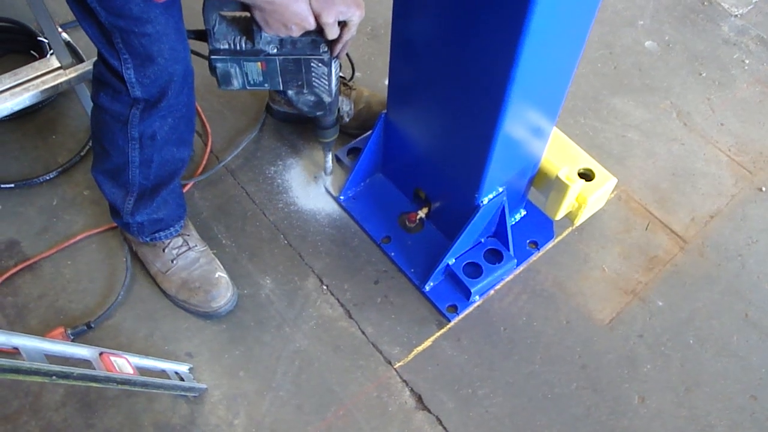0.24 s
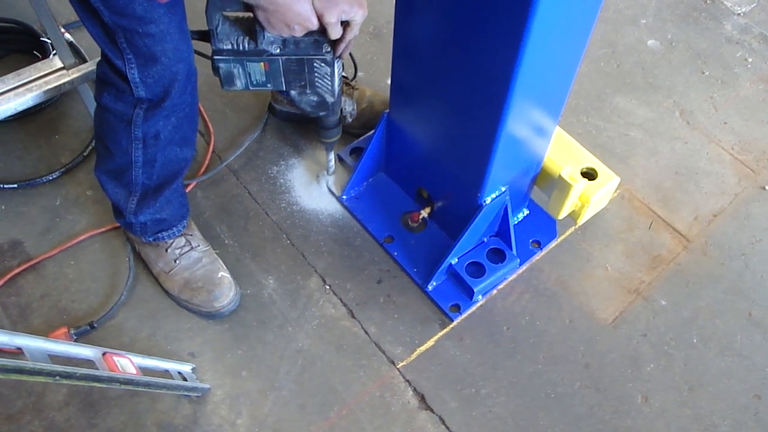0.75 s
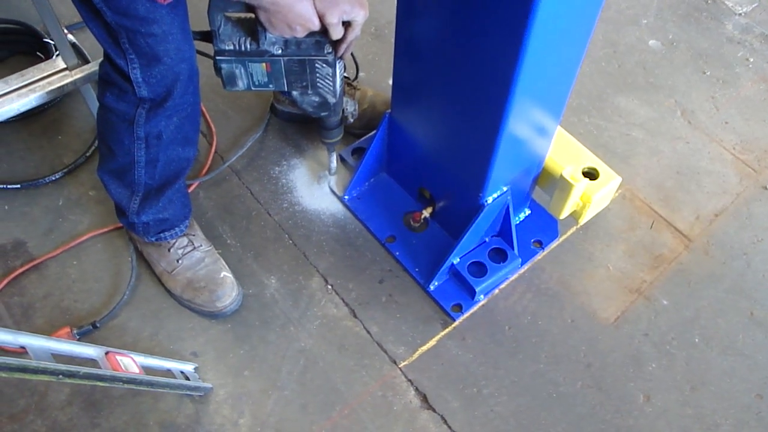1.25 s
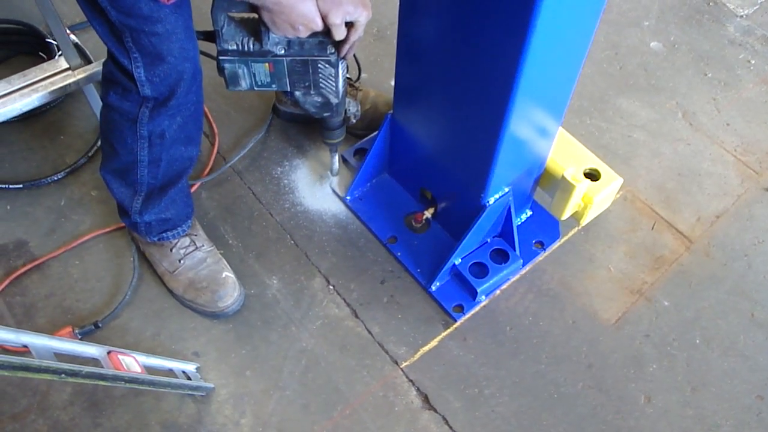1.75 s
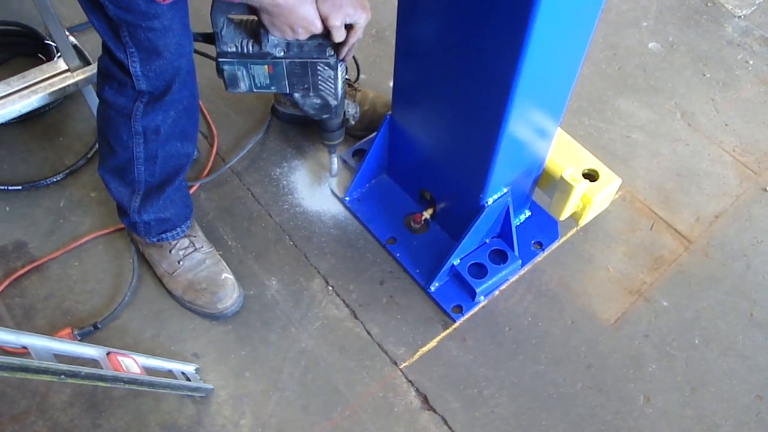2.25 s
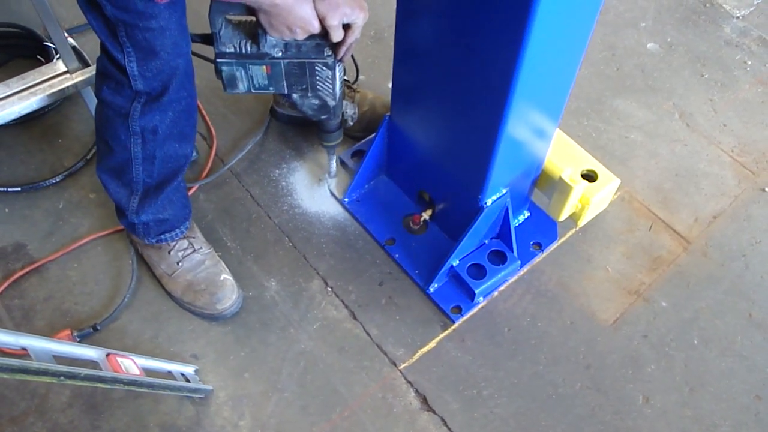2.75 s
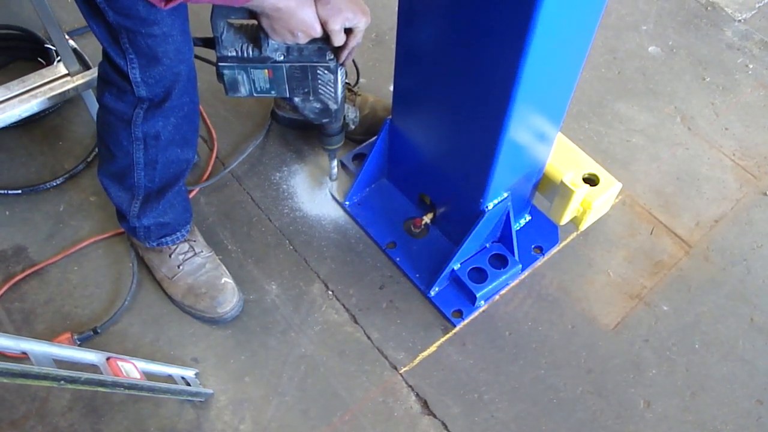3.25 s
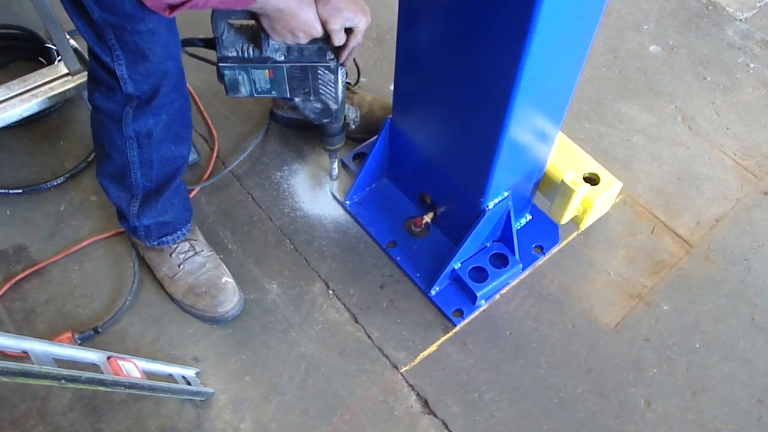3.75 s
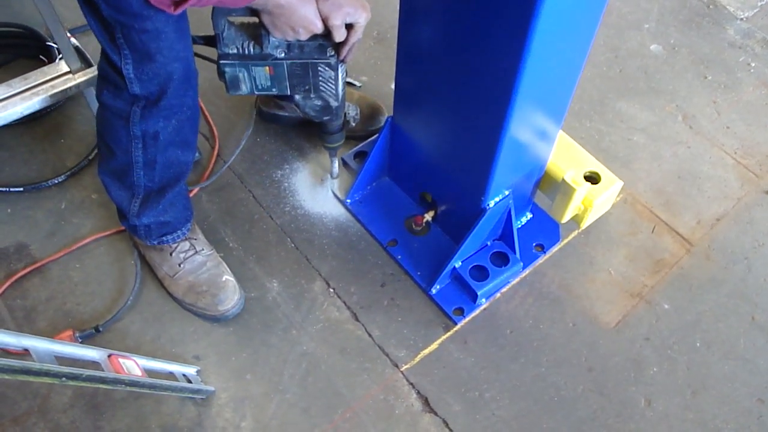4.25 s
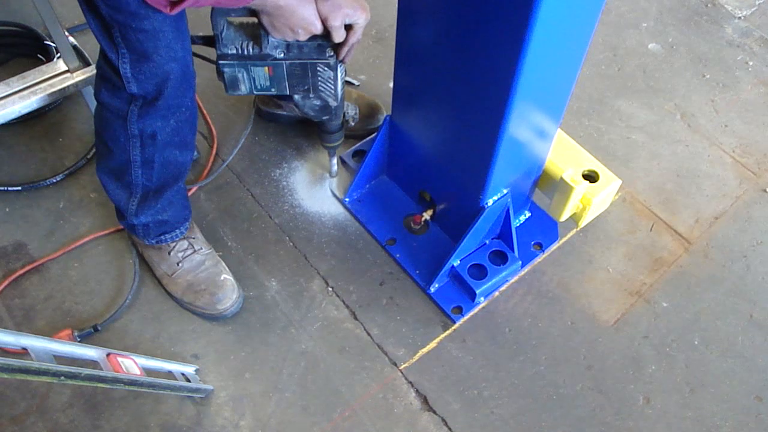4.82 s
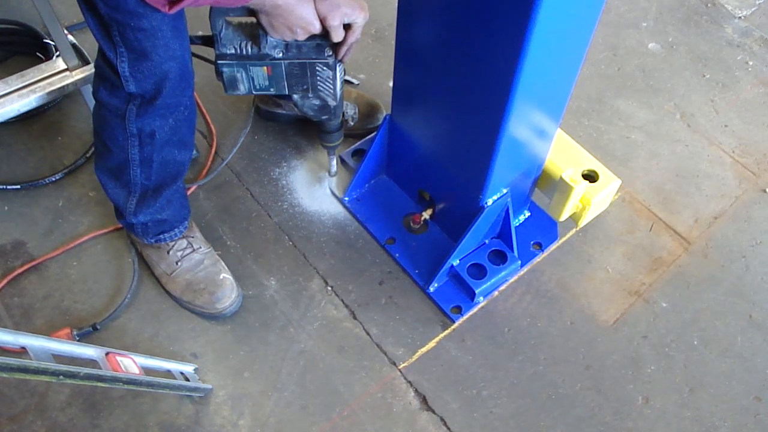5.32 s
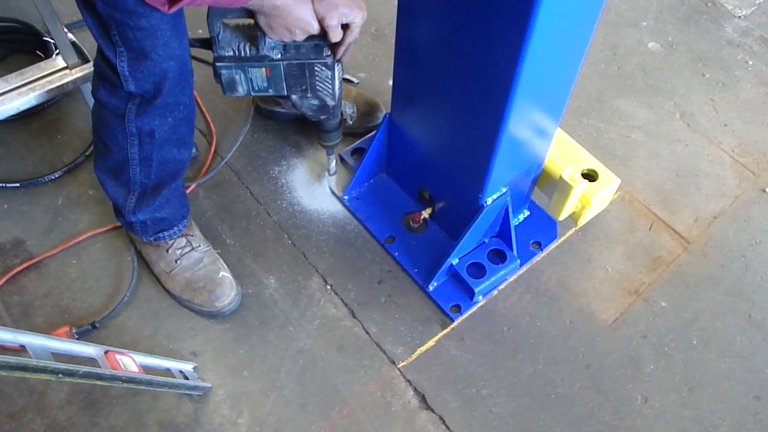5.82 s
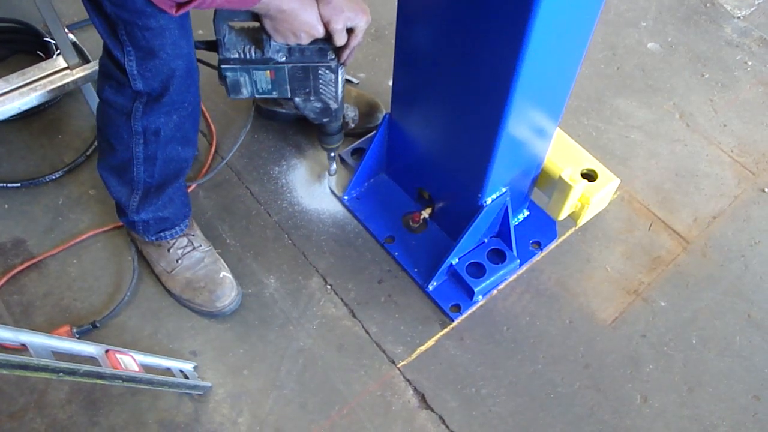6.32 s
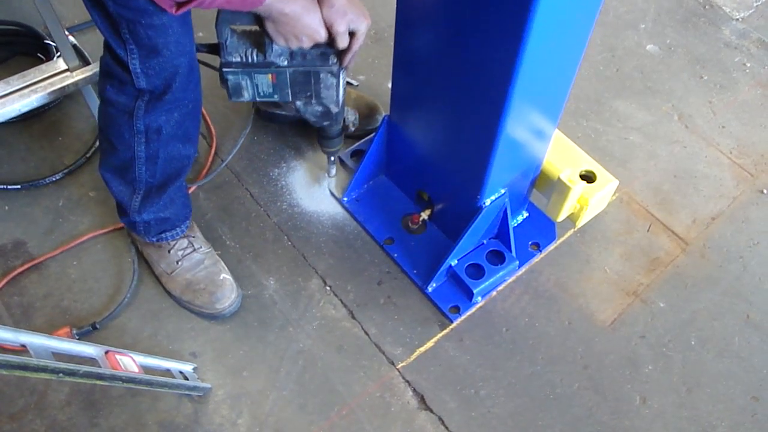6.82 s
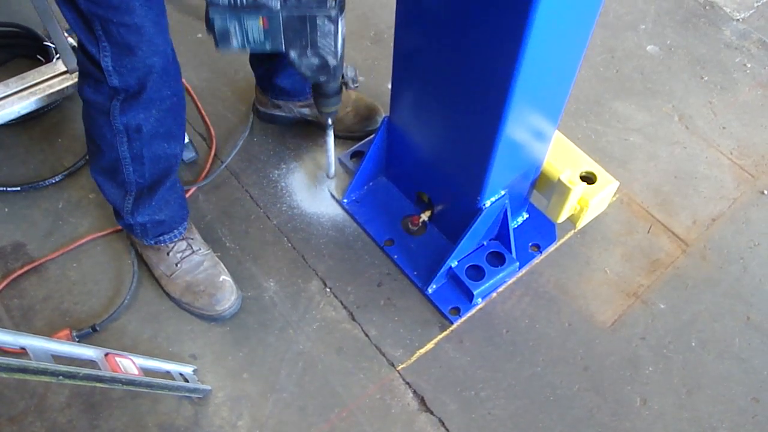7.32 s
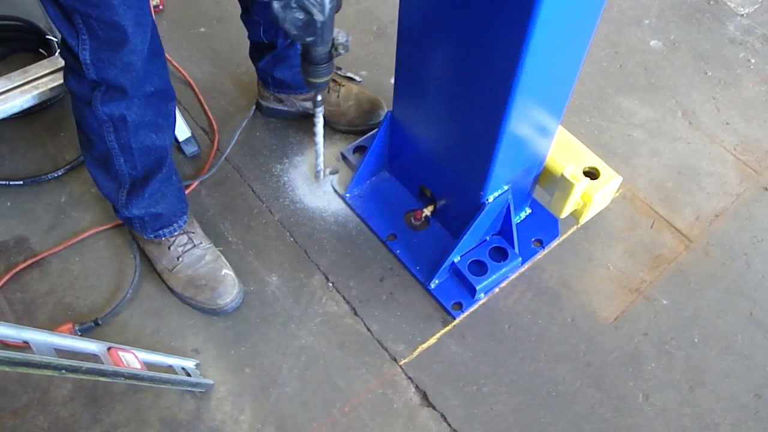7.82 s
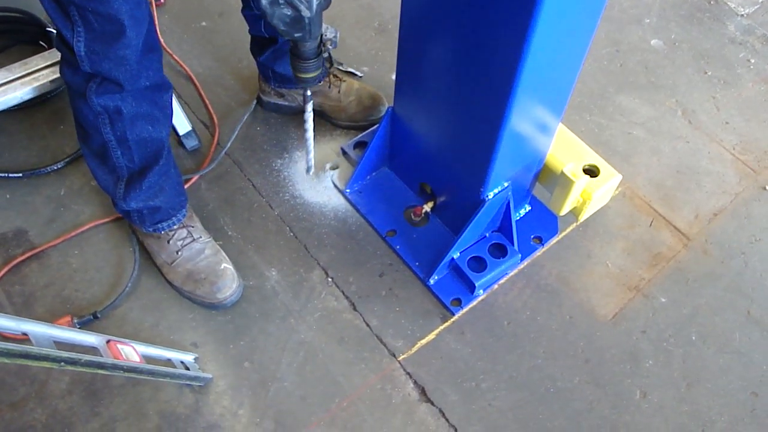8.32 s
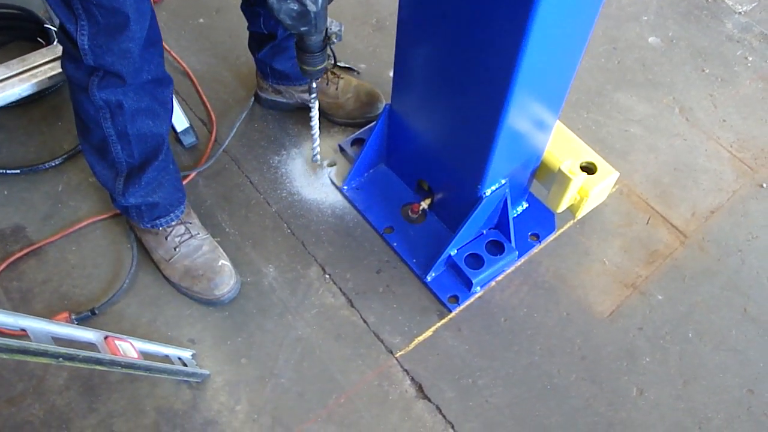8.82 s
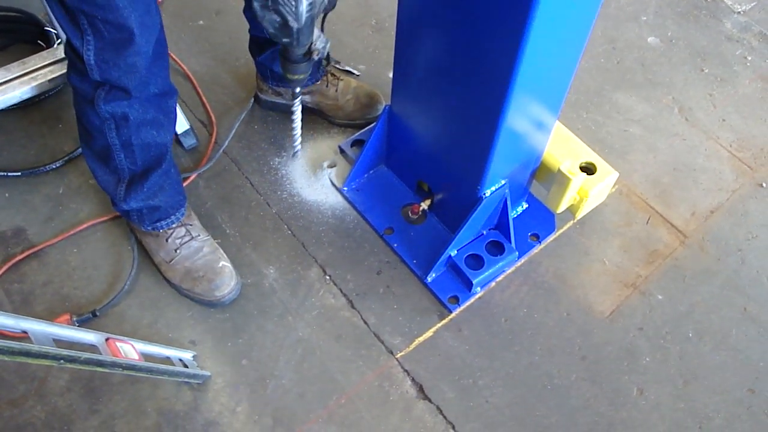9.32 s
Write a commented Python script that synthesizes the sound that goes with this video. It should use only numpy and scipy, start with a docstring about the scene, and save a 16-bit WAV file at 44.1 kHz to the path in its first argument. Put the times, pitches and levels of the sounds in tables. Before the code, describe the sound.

A rotary hammer drills into a concrete floor with a fast, buzzing steel clatter that grows steadily louder over a low hum. As the pressure eases, the bit rings and squeals. The motor switches off and coasts down with a falling gear whine while the loose bit scrapes and clinks, ending in a few knocks. The tool sounds close, in a slightly echoing workshop whose low roar swells at the end.

```python
"""Rotary hammer boring into concrete

About 71 blows a second, growing louder, force a workshop floor to hum and excite the modes of the steel.
As the pressure comes off, the bit rings and friction makes it squeal; drawn out, it clinks in the chuck.
The motor coasts down with a gear whine to a few last knocks, while the low roar of the hall swells."""
import sys
import numpy as np
from scipy import signal
from scipy.fft import rfft, irfft
from scipy.io import wavfile
from scipy.ndimage import uniform_filter1d

SR = 44100
rng = np.random.default_rng(int(sys.argv[2]) if len(sys.argv) > 2 else 0)


def output_pcm(signal):
    """Save a mono or channel-first signal as 16-bit PCM at the path in sys.argv[1].

    Samples are clipped to [-1, 1] before scaling.
    """
    pcm = np.clip(np.atleast_2d(signal).T, -1, 1) * 32767
    wavfile.write(sys.argv[1], SR, np.round(pcm).astype(np.int16))


N = 421590
T = np.arange(N) / SR
OFF_S = 7.508  # the motor is switched off
STEEL_FADE_DB, HOUSING_FADE_DB = 12.5, 4.5  # level lost per tenfold drop in crank speed

# crank speed under power, sagging as the bit rubs, rising once unloaded (t/s, f/Hz)
POWERED_SPEED = [(0, 69.99), (1.5, 70.58), (2, 71.08), (3, 70.77), (3.5, 70.7), (3.75, 71.15), (3.91, 70.1),
                 (4.1, 71.35), (4.34, 69.95), (4.5, 71.1), (4.75, 70.55), (5.07, 71.15), (5.3, 70.55),
                 (5.5, 70.85), (5.75, 70.75), (6, 66.02), (6.15, 70.9), (6.3, 67.67), (6.55, 67.12),
                 (6.75, 75.71), (7.2, 73), (7.508, 75.86)]
# steel clatter at full speed (t/s, level/dB)
CLATTER_LEVEL = [(0, -52), (1.8, -50), (2.12, -50), (2.9, -44.3), (3.8, -42), (5.4, -38), (6.65, -35.5),
                 (7.4, -29)]
# share of hammering clatter against free rattle; some lasts through the coast-down (t/s, share 0-1)
HAMMERING_SHARE = [(0, 0.96), (5.75, 0.87), (5.9, 0.7), (6.55, 0.76), (6.8, 0.37), (7.2, 0.41)]
# spells of eased pressure (start t/s, end t/s, final ring level/dB re clatter)
EASED_SPELLS = [(1.873, 2.115, -2.5), (5.813, 6.577, 1.5)]
# spectral envelope of the undamped bit outside the hole (f/Hz, level/dB)
FREE_BIT_SPECTRUM = [(40, -36), (100, -33), (300, -12), (600, -10.5), (1200, -11.5), (2400, -6.5),
                     (3400, -4), (4700, 1), (5300, -3.5), (6000, -2.5), (7800, -0.5), (8400, -10),
                     (9200, -4), (10700, -38), (14000, -33)]
# its resonances (f/Hz, width/Hz, lift/dB)
FREE_BIT_MODES = [(692, 114, 8.5), (1010, 140, 7.2), (1324, 100, 11), (1506, 115, 9.7), (1767, 190, 14),
                  (2010, 230, 9.3), (2610, 72, 6.1), (2947, 97, 11.6), (3140, 99, 5.3), (3920, 220, 6.2),
                  (4530, 180, 4.7), (5640, 110, 4.6), (6070, 110, 7.9), (6430, 100, 14.5), (7380, 260, 4.5),
                  (8060, 260, 5.9)]


def undb(db):
    """Amplitude ratio of a level in decibels."""
    return 10 ** (np.asarray(db) / 20)


def curve(rows, column=1):
    """Linear interpolation of a table column in time."""
    rows = np.array(rows, float)
    return np.interp(T, rows[:, 0], rows[:, column])


def swell(start, end):
    """Semi-elliptical envelope between two times."""
    age = np.clip((T - start) / (end - start), 0, 1)
    return np.sqrt(4 * age * (1 - age))


def after(time, ramp_s=.035):
    """Linear ramp from 0 to 1, centred on a time."""
    return np.clip((T - time) / ramp_s + .5, 0, 1)


def unit(x):
    """Normalisation to rms 1."""
    return x / np.sqrt(np.mean(x ** 2) + 1e-18)


def noise():
    """Gaussian white noise."""
    return rng.standard_normal(N)


def wander(hz):
    """Random fluctuation: low-passed noise of rms 1."""
    return unit(signal.sosfilt(signal.butter(2, hz, fs=SR, output="sos"), noise()))


def grit(rough_db=2):
    """Amplitude-modulated noise: dense tiny contacts of uneven size."""
    return unit(noise() * undb(rough_db * wander(1660)))


def split(x, hz):
    """Complementary filtering into the bands below and above a frequency."""
    low = signal.sosfiltfilt(signal.butter(3, hz, fs=SR, output="sos"), x)
    return low, x - low


def body(x, spectrum, modes=(), size=8192):
    """Minimum-phase response of a body: resonance peaks on a broad spectrum, at unit power gain."""
    f = np.arange(size // 2 + 1) * SR / size
    hz, db = np.transpose(spectrum)
    peaks_db = sum(lift / (1 + (2 * (f - centre) / width) ** 2) for centre, width, lift in modes)
    gain = undb(np.interp(np.log(f + 1), np.log(hz), db) + peaks_db)
    cepstrum = irfft(np.log(gain))
    cepstrum[1:size // 2] *= 2  # folding makes the response causal
    cepstrum[size // 2 + 1:] = 0
    response = irfft(np.exp(rfft(cepstrum)))
    return signal.fftconvolve(x, response / np.linalg.norm(response))[:N]


def strokes(turns, place, jitter_s, scatter_db):
    """Quasi-periodic impulse train: one pulse a turn, scattered in time and strength."""
    marks = np.arange(1, int(turns[-1])) + place
    chance = rng.standard_normal((len(marks), 2))
    at = np.clip((np.interp(marks, turns, T) + jitter_s * chance[:, 0]) * SR, 0, N - 2)
    strength = undb(scatter_db * chance[:, 1])
    index, fraction = at.astype(int), at % 1
    return np.bincount(index, strength * (1 - fraction), N) + np.bincount(index + 1, strength * fraction, N)


def fade(pulses, decay_s, attack_s):
    """Exponential rise and decay of each pulse."""
    for seconds in (decay_s, attack_s):
        pulses = signal.lfilter([1], [1, -np.exp(-1 / (seconds * SR))], pulses)
    return pulses / (attack_s * SR)


def crank_hz(drag_s=1.491, friction_hz_per_s=16.82):
    """Crank speed: held by the motor, then decaying under viscous air drag and dry friction."""
    drag = np.exp(-np.maximum(T - OFF_S, 0) / drag_s)
    friction_hz = friction_hz_per_s * drag_s
    return np.maximum((curve(POWERED_SPEED) + friction_hz) * drag - friction_hz, .1)


def clatter_gain(fade_db):
    """After switch-off the clatter falls as a power law of the crank speed."""
    return undb(curve(CLATTER_LEVEL) + fade_db * np.log10(crank_hz() / curve(POWERED_SPEED)))


def eased():
    """Gate: 1 while the pressure is eased, else 0."""
    return sum(after(start) - after(end) for start, end, _ in EASED_SPELLS)


def hall():
    """Resonance-coloured noise: a low, slightly wavering roar."""
    levels = [(0, -92), (3, -73), (6, -71), (7.6, -61.5), (8.25, -54), (9.1, -42.5), (9.56, -45)]  # growth of the roar (t/s, level/dB)
    spectrum = [(25, -53), (50, -29), (75, -17), (120, -6), (200, 1), (400, 1.5), (700, 0), (1100, 4.5),
                (2200, -12), (4500, -20), (9000, -21), (14000, -59)]  # its spectral envelope (f/Hz, level/dB)
    modes = [(121, 10, 2.7), (328, 29, 10), (540, 130, 6.7), (706, 60, 9)]  # its resonances (f/Hz, width/Hz, lift/dB)
    return unit(body(noise(), spectrum, modes)) * undb(curve(levels) + 1.1 * wander(6.6))


def reverberation(x, t60_s=1.0, wet_db=-14.5, dull_hz=4000):
    """Diffuse wall reflections form a dull, exponentially decaying tail."""
    t = T[:SR]
    envelope = np.exp(-np.log(1000) * t / t60_s) * (t > .012)
    tail, _ = split(rng.standard_normal(SR) * envelope, dull_hz)
    return undb(wet_db) * signal.fftconvolve(x, tail / np.linalg.norm(tail))[:N]


def slab(turns, rise_db_per_s=.67, bass_rise_db_per_s=.36, dip_db=-5):
    """Forced vibration: the slab hums at harmonics of the blow rate, more as the hole deepens."""
    harmonics = [(1, -45), (2, -21), (3, -11), (4, -16), (5, -6), (6, -1.5), (7, -5), (8, -4.5), (9, 4),
                 (10, 0.5), (11, -4.5), (12, -2.5), (13, 1), (14, 3.5), (15, -12), (16, -27), (17, -16),
                 (18, -7), (19, 0), (20, -16), (21, -0.5), (22, -9), (23, -21), (24, -9), (25, -14)]  # spectrum of the hum (multiple of the blow rate, level/dB)
    hammering = curve(HAMMERING_SHARE)
    blow_hz = np.median(crank_hz()[hammering > .9])
    spectrum = [(22, -60)] + [(n * blow_hz, db) for n, db in harmonics] + [(2600, -8.5), (5000, -34)]
    blows = body(strokes(turns, .92, jitter_s=.00003, scatter_db=1.2), spectrum)
    bass, upper = split(unit(blows), 300)
    hum = bass * undb(bass_rise_db_per_s * (T - EASED_SPELLS[-1][0])) + upper
    level_db = curve(CLATTER_LEVEL) - 14 + rise_db_per_s * T + dip_db * eased()
    return hum * undb(level_db) * hammering ** 3


def gears(turns, order=90, level_db=-52.5):
    """The coasting gears' mesh tone, phase-modulated by backlash, glides down through resonances."""
    backlash = [(35, .38), (48, 2.2)]  # tooth chatter against crank speed (f/Hz, phase wobble/rad)
    spectrum = [(300, -30), (1200, -15), (2000, -11), (2600, -7), (3600, -2), (4700, 5.5), (6500, -11)]  # gearbox response (f/Hz, level/dB)
    modes = [(4500, 700, 3), (3100, 260, 15), (2630, 200, 4)]  # its resonances (f/Hz, width/Hz, lift/dB)
    wobble = np.interp(crank_hz(), *np.transpose(backlash)) * wander(130)
    mesh = np.sin(2 * np.pi * order * turns + wobble) * undb(4 * wander(60)) * after(OFF_S)
    return unit(body(mesh, spectrum, modes)) * undb(level_db)


def last_knocks(attack_s=.0027, halving_db=8.5):
    """Impacts in the nearly stopped mechanism: a harder contact is shorter and brighter."""
    knocks = [(8.871, -25.5, -6), (8.901, -29, -3), (8.93, -28, -10), (8.976, -26.5, -3),
              (9.018, -25.5, -7), (9.049, -28, 6), (9.066, -24.5, -6), (9.12, -25, -8.5), (9.156, -35, 14),
              (9.172, -34, 13), (9.183, -30, -13), (9.24, -36, -6), (9.258, -32, -9), (9.277, -32, -11),
              (9.298, -40, -7), (9.322, -30.5, 4), (9.364, -37, 12), (9.379, -34, -5), (9.409, -39.5, -20)]  # single contacts (t/s, level/dB, treble lift/dB)
    low_force, high_force = np.zeros(N), np.zeros(N)
    for start, db, treble_db in knocks:
        age = np.maximum(T - start, 0)
        decay_s = .007 * .5 ** (treble_db / halving_db)
        force = undb(db) * (1 - np.exp(-age / attack_s)) * np.exp(-np.minimum(age / decay_s, 20))
        low_force += force
        high_force += force * undb(treble_db)
    dull, bright = split(body(grit(rough_db=2.5), FREE_BIT_SPECTRUM, FREE_BIT_MODES), 4200)
    return low_force * unit(dull) + undb(-2) * high_force * unit(bright)


def clinks(turns, attack_s=.00052):
    """Modal ringing: each forward stroke throws the loose bit against the chuck; hard hits also tick."""
    modes = [(1764, 0, 0.0055), (1953, -9.5, 0.0076), (3127, -9.5, 0.0084), (3670, -6.5, 0.0052)]  # modes of the bit (f/Hz, level/dB, decay/s)
    light_hits = [(7.5, -55), (7.7, -35), (8.15, -31), (8.85, -33), (9.1, -42), (9.2, -65)]  # strength of the once-a-turn clinks (t/s, level/dB)
    hard_hits = [(7.7882, -24, -34), (7.826, -33, -21), (7.843, -37, -22), (7.861, -19, -24),
                 (7.9185, -33, -24), (7.957, -19, -25), (7.979, -19.5, -20), (8.0208, -21.5, -24),
                 (8.0435, -38, -20), (8.066, -25, -25), (8.088, -23, -16), (8.111, -25, -19),
                 (8.16, -25, -24), (8.209, -27, -35), (8.354, -27, -37), (8.488, -24, -30),
                 (8.528, -26, -28), (8.609, -28, -33), (8.698, -24.5, -30), (8.7255, -25.5, -35),
                 (8.784, -26, -33), (8.877, -27, -29)]  # hardest clinks (t/s, ring level/dB, tick level/dB)
    tick_spectrum = [(300, -30), (2000, -10), (4300, 2), (7500, 7), (9500, -8), (14000, -29)]  # contact noise (f/Hz, level/dB)
    hits = strokes(turns, .94, jitter_s=.000596, scatter_db=.5) * undb(curve(light_hits)) * after(OFF_S)
    ticks, t = np.zeros(N), T[:3000]
    for start, ring_db, tick_db in hard_hits:
        hits[int(start * SR)] += undb(ring_db)
        ticks[int(start * SR)] += undb(tick_db)
    ring = sum(undb(db) * np.sin(2 * np.pi * hz * t) * np.exp(-t / decay) for hz, db, decay in modes)
    ring *= (1 - np.exp(-t / attack_s)) ** 2
    contacts = fade(ticks, decay_s=.0013, attack_s=.0003) * noise()
    return signal.fftconvolve(hits, ring)[:N] + body(contacts, tick_spectrum)


def squeal(turns, wobble_rad=1.4):
    """Friction tone: the bit binds on the wall of the hole and squeals in a burst after each blow."""
    track = [(5.7, 3950, -55), (6.0, 3950, -47), (6.13, 3950, -45), (6.27, 3970, -44.5), (6.45, 4020, -50),
             (6.66, 4210, -47), (6.85, 3930, -45), (6.97, 4080, -45), (7.17, 3730, -44), (7.21, 3970, -40),
             (7.32, 3980, -43)]  # course of the squeal (t/s, f/Hz, level/dB)
    blows = strokes(turns, 1, jitter_s=.00086, scatter_db=4)
    bursts = unit(fade(blows, decay_s=.007, attack_s=.0012))
    tone = np.sin(2 * np.pi * np.cumsum(curve(track)) / SR + wobble_rad * wander(65))
    binding = after(track[0][0]) - after(track[-1][0])
    return unit(tone) * bursts * undb(curve(track, column=2)) * binding


def rubbing(force, catch_db=3):
    """Friction sustains narrow, gliding resonances of the steel, fed in time with the piston."""
    # singing resonances (start t/s, end t/s, first f/Hz, last f/Hz, level/dB re clatter)
    rubs = [(5.0, 5.8, 986, 976, -14), (6.046, 6.6, 277, 275, -32), (6.03, 6.43, 950, 1080, -15.5),
            (6.15, 7.5, 1344, 1360, -16.5), (6.697, 7.146, 1010, 965, -16), (7.2, 8.2, 740, 700, -21.5),
            (7.353, 7.6, 4460, 4374, -7.5), (7.59, 7.9, 1768, 1774, -8.5), (8.15, 8.542, 7100, 7330, -7),
            (8.17, 8.292, 3140, 3130, -5), (8.28, 8.56, 7870, 7870, -16), (8.517, 8.857, 6140, 6240, -4),
            (8.525, 8.837, 6500, 6360, -7), (9.08, 9.24, 492, 500, -2), (9.235, 9.317, 3170, 3170, 4.5),
            (9.25, 9.31, 1774, 1800, 7)]
    contacts = force ** 2 * noise() * undb(catch_db * wander(15))
    out = np.zeros(N)
    for start, end, first_hz, last_hz, db in rubs:
        span = (T > start - .05) & (T < end + .05)
        hz = np.interp(T[span], [start, end], [first_hz, last_hz])
        carrier = np.exp(2j * np.pi * np.cumsum(hz) / SR)
        width_hz = 73 + .021 * first_hz
        narrow = signal.butter(2, width_hz / 2, fs=SR, output="sos")
        ring = (signal.sosfilt(narrow, contacts[span] / carrier) * carrier).real  # gliding band-pass
        running_rms = np.sqrt(np.abs(uniform_filter1d(ring ** 2, size=1800)) + 1e-12)
        out[span] += ring / running_rms * undb(db) * swell(start, end)[span]
    return out * clatter_gain(STEEL_FADE_DB)


def bit_ring(turns, pressed_db=-10.5, growth_db_per_s=17):
    """Free vibration of the bit after each blow grows as the load eases and ends when it is lifted."""
    spectrum = [(2000, -25), (3500, -40), (6000, -9.5), (8200, 4), (10000, 5), (14000, -61)]  # response of the bit in the hole (f/Hz, level/dB)
    modes = [(3860, 110, 15), (6320, 110, 24), (7970, 440, 16.2), (8340, 200, 5.7)]  # its resonances (f/Hz, width/Hz, lift/dB)
    force = fade(strokes(turns, 1, jitter_s=.0001, scatter_db=3), decay_s=.0038, attack_s=.00071)
    lift_off_s = EASED_SPELLS[-1][1]
    gain = undb(pressed_db) * (1 - after(lift_off_s))
    for start, end, db in EASED_SPELLS:
        build_up = undb(db - growth_db_per_s * np.maximum(end - T, 0))
        gain = np.maximum(gain, (after(start) - after(end)) * build_up)
    return unit(body(force * noise(), spectrum, modes)) * gain * undb(curve(CLATTER_LEVEL))


def piston(turns, scrape_db=-11.5):
    """Reciprocating force: a knock at each end of travel, longer as it slows, over scraping gears."""
    forward = strokes(turns, .874, jitter_s=.00045, scatter_db=.65)
    return_db = np.interp(crank_hz(), [25.8, 49.5], [0, -13])  # the return stroke is soft at speed
    back = strokes(turns, .42, jitter_s=.00017, scatter_db=2.5) * undb(return_db)
    both = (forward + back) * undb(-3 * after(8.92))  # weaker near standstill
    sharp = fade(both, decay_s=.0044, attack_s=.0013)
    soft = fade(both, decay_s=.005, attack_s=.0039)
    slowness = np.clip(1 - crank_hz() / 62, 0, 1)
    force = np.hypot((1 - slowness) * sharp + slowness * soft, undb(scrape_db))
    return force / np.sqrt(uniform_filter1d(force ** 2, size=8000))


def free_rattle(force):
    """Piston knocks excite the unloaded tool; the bit's own modes take over as it leaves the hole."""
    spectrum = [(40, -35), (100, -63), (300, -19.5), (600, -11), (1200, -11), (2500, 0.5), (3400, 1),
                (4000, 9), (4800, 1), (5600, 1.5), (7600, 3), (8600, -7.5), (10700, -47), (14000, -15)]  # response of the unloaded tool (f/Hz, level/dB)
    modes = [(635, 140, 11.6), (990, 200, 10), (1330, 230, 11), (1690, 250, 11), (1974, 160, 9.1),
             (3030, 180, 6.3), (3680, 120, 2), (4500, 110, 1.8), (4740, 150, 2.4), (5700, 170, 2),
             (6240, 290, 3.6), (7660, 170, 4.7), (8850, 290, 5.6)]  # its resonances (f/Hz, width/Hz, lift/dB)
    dying_away = [(8.88, -0.5), (8.97, -7), (9.3, -6.5), (9.335, -26)]  # the rattle sinks to a faint scrape (t/s, level/dB)
    contacts = force * grit()
    in_hole = body(contacts, spectrum, modes)
    in_air = body(contacts, FREE_BIT_SPECTRUM, FREE_BIT_MODES)
    withdrawn = np.interp(T, [7.55, 8.45], [0, 1])
    return ((1 - withdrawn) * in_hole + withdrawn * in_air) * undb(curve(dying_away))


def drilling(turns, crush_db=-11):
    """Impact excitation: blow, rebounds and chuck slap ring the steel over steadily crushing concrete."""
    impacts = [(0.94, -10, 0.0046), (0.07, -8.5, 0.0087), (0.5, -12, 0.0018), (0.49, -11, 0.0011),
               (0.58, -5, 0.0018)]  # contacts within a turn (place 0-1, level/dB, decay/s)
    spectrum = [(40, -35), (100, -44), (300, -19.5), (530, -12), (630, -6), (1300, -7), (2900, -6),
                (3700, 2), (5000, 7), (5800, 1), (7300, 3.5), (9000, -1), (10700, -32), (13000, -5),
                (15000, -14)]  # response of the loaded tool (f/Hz, level/dB)
    bit_modes = [(1686, 240, 4.8), (1914, 80, 3.8), (3397, 174, 5.3), (3860, 170, 3.8), (4230, 130, 2.9),
                 (5480, 88, 2.4), (6150, 92, 3.6), (6980, 130, 5.5), (8280, 160, 3.6), (9300, 200, 2.6),
                 (10065, 810, 21.1), (10720, 333, 26.1)]  # resonances of the bit (f/Hz, width/Hz, lift/dB)
    plate_modes = [(998, 78, 7.8)]  # base plate, heard only under pressure (f/Hz, width/Hz, lift/dB)
    power = undb(crush_db) ** 2
    for place, db, decay_s in impacts:
        hits = strokes(turns, place, jitter_s=.00027, scatter_db=2.5)
        power += (undb(db) * fade(hits, decay_s, attack_s=.00061)) ** 2
    bite = undb(.63 * wander(34))  # the cutting edges meet harder and softer grains
    contacts = bite * np.sqrt(power) * grit()
    with_plate = body(contacts, spectrum, bit_modes + plate_modes)
    bit_alone = body(contacts, spectrum, bit_modes)
    pressed = np.interp(curve(HAMMERING_SHARE), [.65, .9], [0, 1])
    return unit(pressed * with_plate + (1 - pressed) * bit_alone)


def scene(crossover_hz=3347):
    """Superposition of the crank-driven tool, its reverberation, the slab and the hall."""
    scrapes = [(7.313, 7.57, 1.5), (7.796, 8.17, 2)]  # the flutes scrape the rim on the way out (start t/s, end t/s, lift/dB)
    turns = np.cumsum(crank_hz()) / SR + .379
    hammering, force = curve(HAMMERING_SHARE), piston(turns)
    scrape_db = sum(db * swell(start, end) for start, end, db in scrapes)
    steel_gain = clatter_gain(STEEL_FADE_DB) * undb(scrape_db)
    housing_gain = clatter_gain(HOUSING_FADE_DB) * undb(-7)
    clatter = np.zeros(N)
    for share, source in ((hammering, drilling(turns)), (1 - hammering, free_rattle(force))):
        housing, steel = split(source, crossover_hz)
        clatter += np.sqrt(share) * (unit(steel) * steel_gain + unit(housing) * housing_gain)
    clatter *= undb(-.63 * eased())  # eased blows crush less
    steel_tones = bit_ring(turns) + rubbing(force) + squeal(turns) + clinks(turns)
    tool = clatter + steel_tones + gears(turns) + last_knocks()
    return (tool + reverberation(tool) + slab(turns) + hall())[None]


def record(dry, shelf_db=-11, cutoff_hz=14800):
    """Band limiting: a shelf dulls the highest treble and a steep low-pass cuts the top."""
    shelf = undb(np.interp(np.fft.rfftfreq(N, 1 / SR), [11100, 11400], [0, shelf_db]))
    low_pass = signal.ellip(8, .2, 70, cutoff_hz, fs=SR, output="sos")
    return signal.sosfilt(low_pass, irfft(rfft(dry) * shelf, N))


dry = scene()
out = record(dry)
output_pcm(out)
```